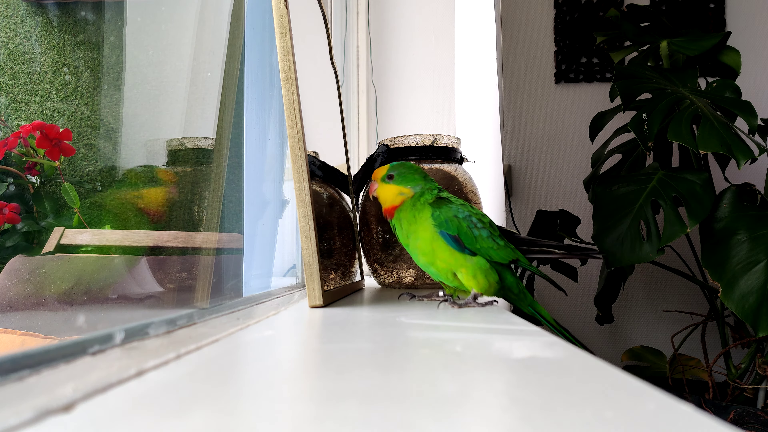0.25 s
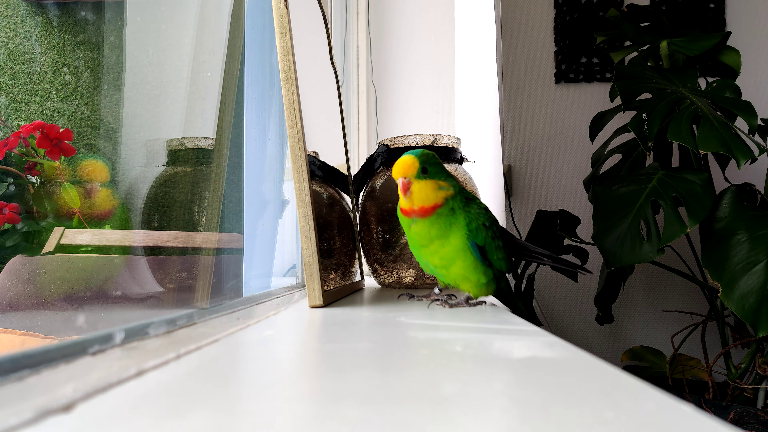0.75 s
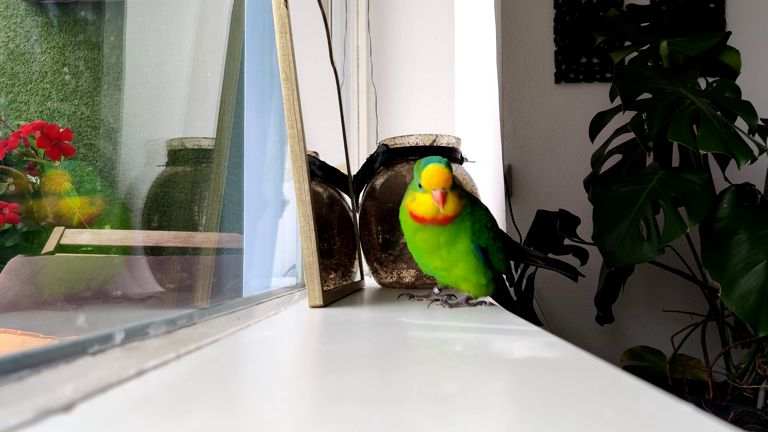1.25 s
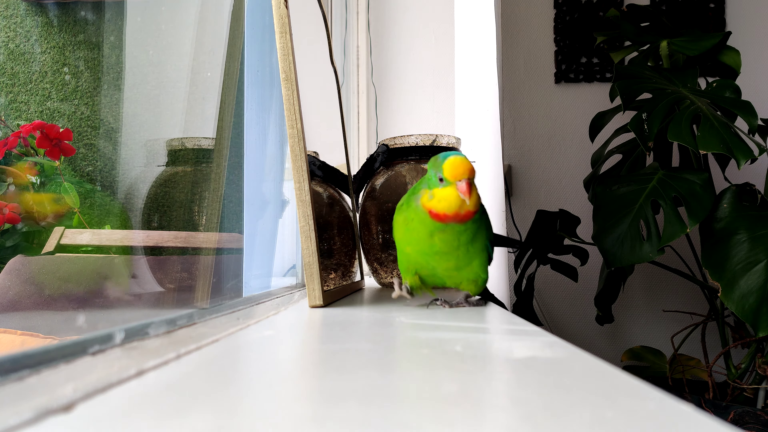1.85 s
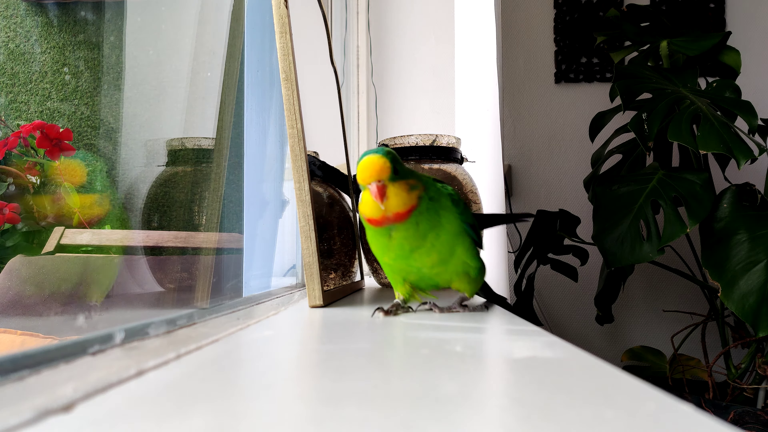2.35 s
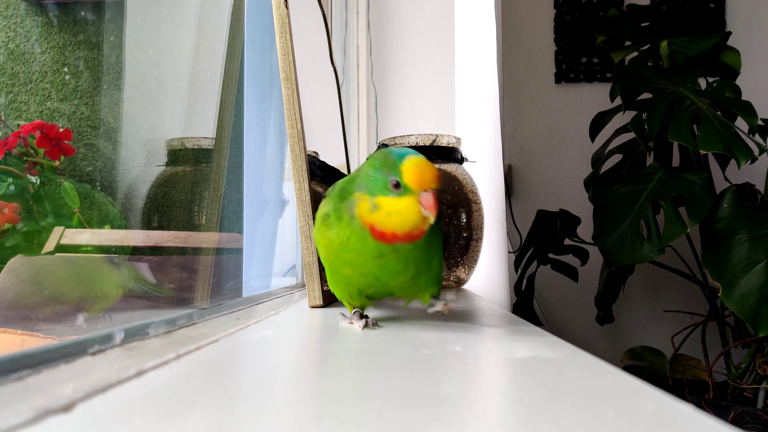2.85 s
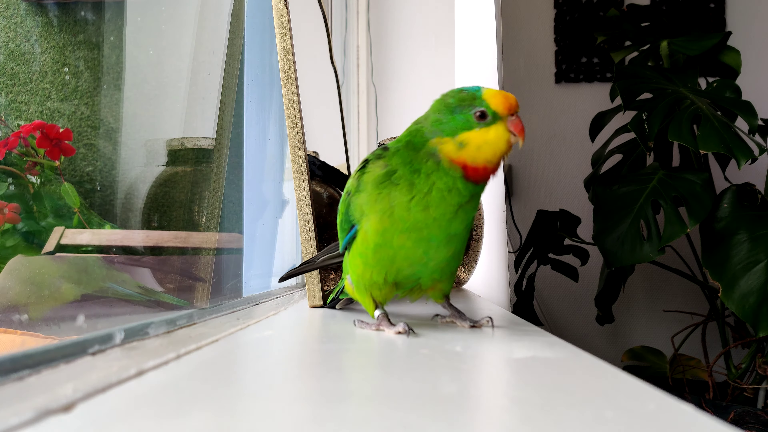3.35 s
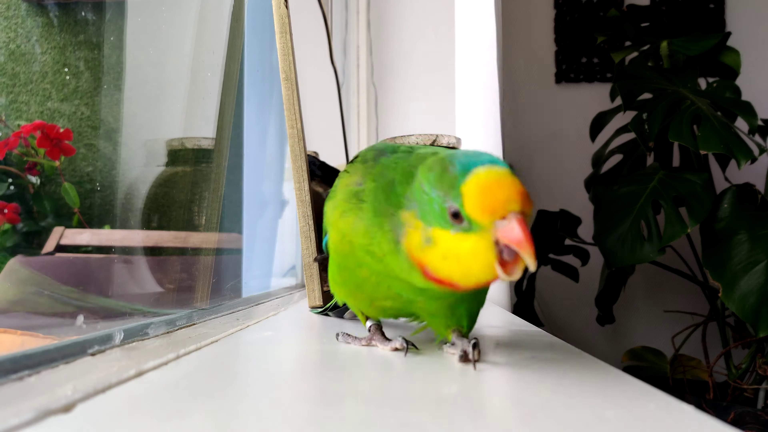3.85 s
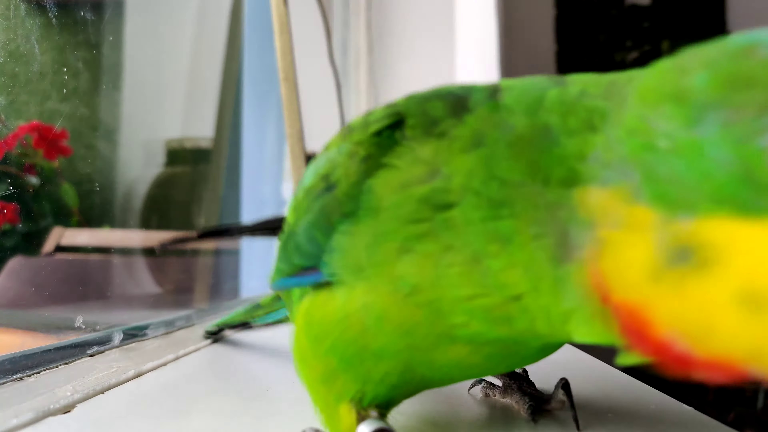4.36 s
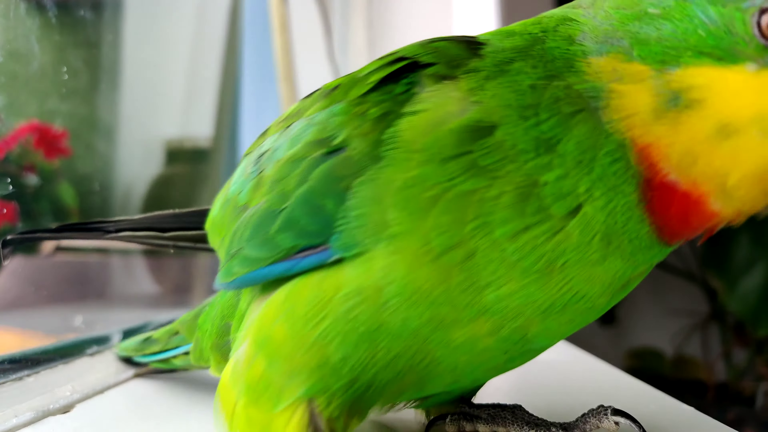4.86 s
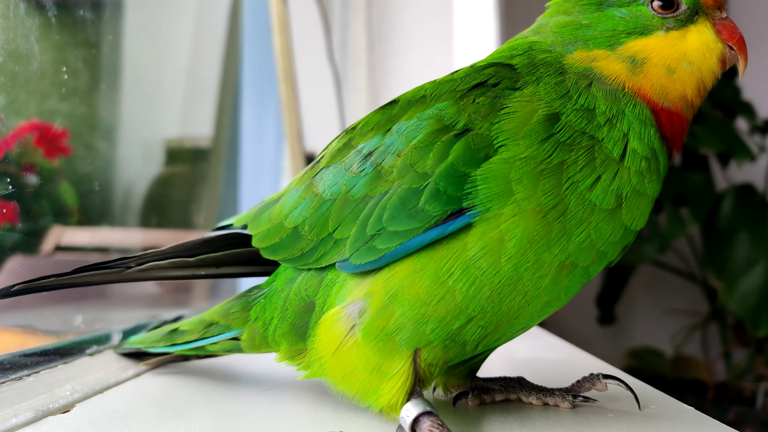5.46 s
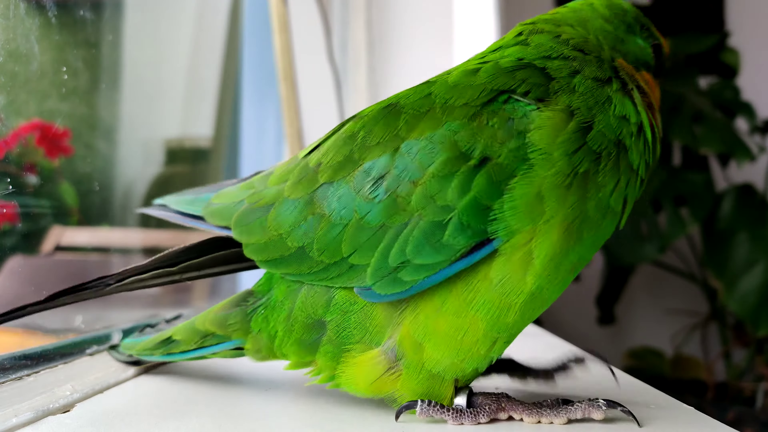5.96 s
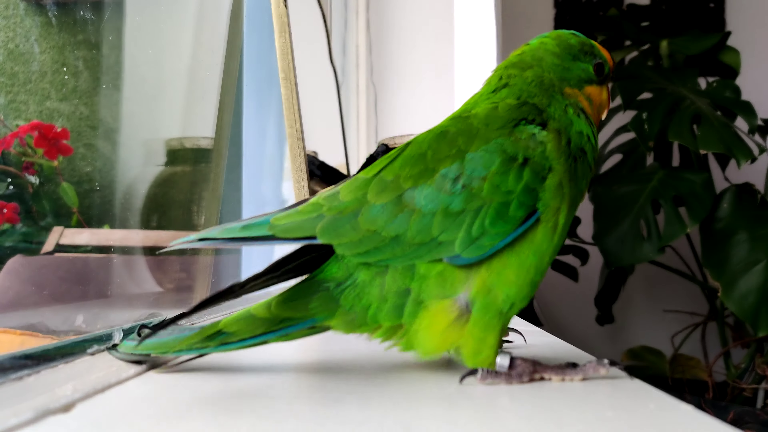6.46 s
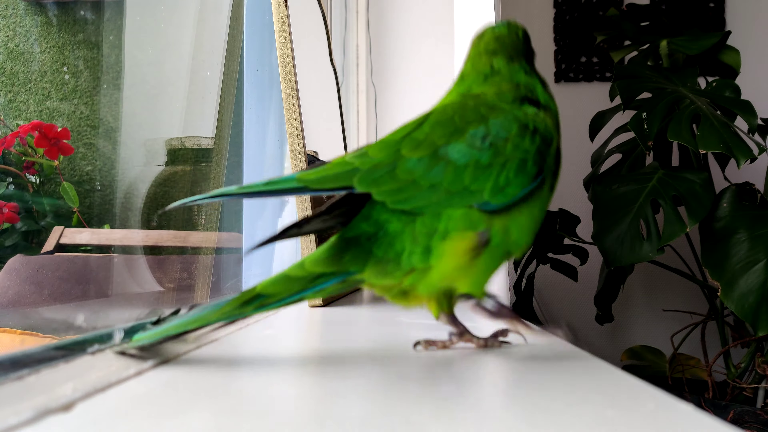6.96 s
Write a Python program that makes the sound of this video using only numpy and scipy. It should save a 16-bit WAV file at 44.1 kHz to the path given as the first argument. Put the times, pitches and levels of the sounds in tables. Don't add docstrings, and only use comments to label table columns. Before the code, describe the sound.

Indoors, one rough wavering parrot squawk rings out, light claw ticks and scuffs approach, a quick close trill and chirp follow, then steps retreat.

```python
import sys
import numpy as np
from scipy import signal
from scipy.fft import rfft, irfft, next_fast_len
from scipy.io import wavfile
from scipy.ndimage import uniform_filter1d, map_coordinates

SR = 44100
rng = np.random.default_rng(int(sys.argv[2]) if len(sys.argv) > 2 else 0)


def transcribe(signal):
    frames = np.atleast_2d(signal).T
    limited = np.clip(frames, -1, 1)
    pcm = np.round(limited * 32767).astype(np.int16)
    wavfile.write(sys.argv[1], SR, pcm)


def attenuation_scalar(level_db):
    decades = np.asarray(level_db, float) / 20
    return 10 ** decades


N = 317961

# t/s, claw tick level/dB, knock level/dB, knock f/Hz
STEPS = [(1.9551, -39, -46, 240), (1.9667, -42, -57.5, 1018), (2.1913, -35.5, -41.5, 301.5),
         (2.3939, -46, -45, 297), (2.4044, -32, -39, 1400), (2.6004, -34.5, -43, 634),
         (2.796, -32, -45, 1060), (2.96, -30, -44.5, 403), (3.1837, -33.5, -39, 875),
         (3.5228, -30, -52, 362), (3.705, -35.5, -33, 445), (3.896, -31, -43.5, 323),
         (4.0568, -40.5, -60.5, 382), (4.1005, -29, -47, 837), (4.1095, -26, -34.5, 556),
         (4.135, -24, -32.5, 922), (4.269, -28, -46, 474), (4.3959, -32.5, -43, 336),
         (4.4618, -47, -59, 300), (4.4675, -33.5, -57.5, 450), (4.5014, -35, -43.5, 230),
         (4.5157, -26, -35, 361), (4.5588, -23.5, -31, 301), (4.5781, -39.5, -36, 300.6),
         (4.8452, -29.5, -36.5, 303), (5.0378, -28.5, -30.5, 291.6), (5.0514, -34.5, -43.5, 1610)]
RETREAT = [
    (5.9614, -42.5, -49.5, 315),
    (5.9697, -39, -55.5, 473),
    (6.1205, -29, -45, 307.5),
    (6.362, -28.5, -44, 651),
    (6.4827, -33.5, -47, 432),
    (7.1, -25.5, -55, 308),
    (7.1429, -30, -41, 320),
]


def unit(x):
    return x / np.sqrt(np.mean(x ** 2) + 1e-20)


def peaked(x):
    return x / np.abs(x).max()


def along(points, hz):
    f, v = np.transpose(points)
    return np.interp(np.log(hz + 1), np.log(f + 1), v)


def curves(rows):
    s, *cols = np.transpose(rows)
    return [np.interp(np.arange(N) / SR, s, c) for c in cols]


def wobble(rate_hz):
    knots = rng.standard_normal(int(N * rate_hz / SR) + 4)
    return map_coordinates(knots, [np.arange(N) * rate_hz / SR])


def filtered(x, response):
    n = x.shape[-1]
    m = next_fast_len(2 * n)
    return irfft(rfft(x, m) * response(np.fft.rfftfreq(m, 1 / SR)), m)[..., :n]


def sided(x, balance, lag_s=0, lead=((1, 0),)):
    half = np.array([[.5], [-.5]])

    def response(hz):
        phase = along(lead, hz) - 2 * np.pi * hz * lag_s
        return attenuation_scalar(half * along(balance, hz)) * np.exp(1j * half * phase)
    return filtered(x, response)


def modes(table):
    def response(f):
        return sum((-1) ** k * attenuation_scalar(db) * 1j * f * w / (c * c - f * f + 1j * f * w)
                   for k, (c, w, db) in enumerate(table))
    return response


def rush(spectrum, patchy_db):
    # f/Hz, left-right likeness
    alike = [(60, 0.96), (130, 0.46), (290, 0.75), (640, 0.47), (1410, 0.069), (3100, 0.93), (6820, -0.21),
             (15000, -0.15)]
    # f/Hz, left minus right level/dB
    air_side = [(60, 2), (110, 3.5), (200, 3), (380, 6.5), (700, 7), (1290, -1), (2380, 4.5), (4400, -1),
                (8120, 0.5), (15000, 3.5)]
    z = signal.stft(rng.standard_normal((2, N)), nperseg=512)[2]
    field = uniform_filter1d(rng.standard_normal(z.shape[1:]), size=6, axis=0)
    field = uniform_filter1d(field, size=14, axis=1)
    pair = signal.istft(z * attenuation_scalar(patchy_db * unit(field)), nperseg=512)[1][:, :N]

    def response(hz):
        turn = np.arccos(np.clip(along(alike, hz), -1, 1)) / 2
        return attenuation_scalar(along(spectrum, hz)) * [np.cos(turn), np.sin(turn)]
    mid, side = filtered(pair, response)
    return unit(sided(np.array([mid + side, mid - side]), air_side))


def air():
    # f/Hz, level/dB
    rumble_db = [(12, -27.5), (20, -1), (54, -5.5), (86, -10.5), (150, -13), (200, -41.5), (330, -120)]
    tone_db = [(60, -40), (110, -16.5), (230, -9.5), (450, -16), (700, -15.5), (1500, -23), (3000, -28),
               (4500, -35.5), (7000, -48.5), (12000, -70.5)]
    hiss_db = [(2500, -30), (4500, -7.5), (7600, -10), (15000, -6), (16200, -5.5), (16600, -32.5)]
    # t/s, level/dB
    bustle = [
        (0, -1),
        (1.7, -2.5),
        (2.35, 2.5),
        (3.3, -2),
        (4.4, 3),
        (5.2, 3.5),
        (5.6, -4),
        (6.3, 2),
        (6.75, -1.5),
        (7.21, 3),
    ]
    # t/s, level/dB
    machine = [
        (.3, -76),
        (.4, -64.5),
        (1.9, -62.5),
        (2.4, -53),
        (2.7, -61),
        (3.9, -63.5),
        (5.4, -68),
        (7.21, -66),
    ]
    # t/s, level/dB
    passing = [
        (6.55, -92),
        (6.62, -47.5),
        (6.78, -56),
        (6.86, -89),
    ]
    bustle_db, = curves(bustle)
    t = np.arange(N) / SR
    hum = attenuation_scalar(curves(machine)[0] + 3.2 * wobble(6.8)) * np.sin(2 * np.pi * (227 * t + .3 * wobble(5.4)))
    drone = attenuation_scalar(curves(passing)[0]) * np.sin(2 * np.pi * 110.0 * t)
    rumble = attenuation_scalar(-55 + .8 * bustle_db + 1.9 * wobble(5.1)) * rush(rumble_db, patchy_db=1.5)
    tone = attenuation_scalar(-58 + .4 * bustle_db) * rush(tone_db, patchy_db=1.9)
    hiss = attenuation_scalar(-70 + bustle_db) * rush(hiss_db, patchy_db=0.9)
    return rumble + tone + hiss + hum + drone


def room(x, colour, balance):
    # f/Hz, t60/s
    t60 = [(200, 0.44), (1000, 0.61), (2500, 0.57), (4000, 0.52), (8000, 0.48), (15000, 0.24)]
    hz, t, z = signal.stft(rng.standard_normal((3, 2, SR * 3 // 4)), SR, nperseg=256)
    start_db = along(colour, hz) + np.array([[.5], [-.5]]) * along(balance, hz)
    decay_db = start_db[..., None] - 60 * t / along(t60, hz)[:, None]
    tail = signal.istft(z * attenuation_scalar(decay_db), SR, nperseg=256)[1]
    tail = tail * (1 - np.exp(-np.arange(tail.shape[-1]) / (0.0017 * SR)))
    tail = tail / np.linalg.norm(tail[0]) * np.sqrt(2)
    turn = np.cos(np.pi * (np.arange(N) / (.09 * SR) + np.arange(3)[:, None] / 3)) ** 2
    return signal.fftconvolve((x * turn)[:, None], tail, axes=2).sum(0)[:, :N]


def echoes(x):
    surfaces = [(.0011, 0.0017, -14.5), (.0027, 0.0025, -16.5), (.0046, 0.0049, -15.5),
                (.0083, 0.0095, -16.5)]
    return sum(attenuation_scalar(db) * np.array([np.roll(x, round(left * SR)), np.roll(x, round(right * SR))])
               for left, right, db in surfaces)


def scuffs():
    # t/s, length/s, level/dB
    drags = [(0.381, .025, -61), (2.218, .09, -66), (4.051, .035, -56), (4.385, .026, -52),
             (4.465, .058, -53), (4.514, .03, -47), (4.802, .066, -56), (4.949, .098, -52),
             (5.089, .03, -56), (5.841, .03, -69.5), (6.001, .04, -69), (6.23, .03, -64.5),
             (7.015, .025, -55)]
    # t/s, level/dB
    scrapes = [(1.852, -57.5), (2.138, -62), (2.48, -61.5), (2.712, -61.5), (2.798, -56), (2.884, -59),
               (3.47, -62.5), (3.692, -58), (3.77, -46.5), (4.0, -57), (4.325, -67), (5.897, -62),
               (6.282, -58.5), (6.99, -64)]
    # f/Hz, level/dB
    rustle = [(1500, -38.5), (2500, -13), (3800, -8.5), (5200, -2), (6500, -5), (10300, -5.5), (15000, -9),
              (16500, -25)]
    slide_s, slide_db, scrape_s = .04, -35.5, .015
    slides = [(s, slide_s, tick_db + slide_db) for s, tick_db, *_ in STEPS + RETREAT]
    stroke = np.zeros(N + SR)
    for s, length_s, db in drags + slides + [(s, scrape_s, db) for s, db in scrapes]:
        n = round(length_s * SR)
        stroke[round(s * SR):][:n] += attenuation_scalar(db) * np.hanning(n) ** 0.2
    shared, own = rng.standard_normal(N), rng.standard_normal((2, N))
    grit = filtered(shared + 0.77 * own, lambda hz: attenuation_scalar(along(rustle, hz)))
    grit = unit(grit * attenuation_scalar(1.7 * wobble(500)))
    return stroke[:N] * grit * attenuation_scalar([[1.5], [-1.5]])


def ring_drag(s, length_s, level_db, partials):
    t = np.arange(N) / SR - s
    drag = (t > 0) * (t < length_s) * attenuation_scalar(level_db - 12 * np.clip(t, 0, length_s) / length_s)
    return drag * sum(attenuation_scalar(db + 4.8 * wobble(210)) * np.sin(2 * np.pi * (hz * t + 0.193 * wobble(150)))
                      for hz, db in partials)


def leg_ring():
    # f/Hz, level/dB
    partials = [(1916, -59), (3050, -60.5), (3628, -65), (4840, -57.5), (6158, -59), (7526, -63),
                (9243, -67), (10990, -75)]
    long_drag = ring_drag(2.594, .125, level_db=-4, partials=partials)
    return long_drag + ring_drag(1.852, .02, level_db=6, partials=partials[3:4])


def feet():
    # t/s, claw tick level/dB, knock level/dB, knock f/Hz
    shuffle = [
        (.012, -75.5, -56, 300),
        (.338, -68, -56.5, 300),
        (.385, -68.5, -41.5, 230),
    ]
    # f/Hz, level/dB
    claw = [(880, -29), (1500, -9.5), (2500, -5), (4850, -1), (7180, -10.5), (9990, -5), (11700, -12),
            (14800, -0.5), (16500, -24.5)]
    # f/Hz, width/Hz, level/dB
    board = [(450, 360, -8.5), (910, 160, -13), (1400, 1500, -5), (2240, 400, -3.5)]
    cavity = [(134, 28, 1.5), (259.6, 48, -0.5)]
    over_knock_db, drop_db_per_octave = 3, 3.5
    pan_mean_db, pan_spread_db = 5, 2.5
    ticks, lows = np.zeros((2, N + SR)), np.zeros(N + SR)
    t = np.arange(SR // 8) / SR
    push = -np.exp(-((t - .0006) / 0.00013) ** 2)
    for s, tick_db, knock_db, knock_hz in shuffle + STEPS + RETREAT:
        thud_db = knock_db + over_knock_db - drop_db_per_octave * np.log2(knock_hz / cavity[1][0])
        pan_db = pan_mean_db + pan_spread_db * rng.standard_normal()
        grit = rng.standard_normal((4, len(t)))
        burst = (grit[0] + .5 * grit[:2]) * (attenuation_scalar(-60 * t / 0.011) + .08 * attenuation_scalar(-60 * t / .06))
        tick = filtered(burst, lambda hz: attenuation_scalar(along(claw, hz)))
        skin = modes([(knock_hz, 0.44 * knock_hz, 0)] + board)
        knock = filtered(push + 0.4 * grit[2] * attenuation_scalar(-60 * t / .07), skin) + 0.39 * push
        thud = filtered(push + 0.16 * grit[3] * attenuation_scalar(-60 * t / .06), modes(cavity))
        low = attenuation_scalar(knock_db + 11.0) * peaked(knock) + attenuation_scalar(thud_db) * peaked(thud)
        at = round(s * SR)
        lows[at:][:len(t)] += low
        ticks[:, at:][:, :len(t)] += attenuation_scalar([[pan_db / 2], [-pan_db / 2]]) * attenuation_scalar(tick_db) * peaked(tick)
    return ticks[:, :N] + sided(lows[:N], [(100, 8.8), (1500, 5.5)], lag_s=-.00022)


def smacks():
    # t/s, level/dB
    clicks = [
        (4.937, -33.5),
        (5.008, -21),
        (5.0112, -26),
        (5.028, -23.5),
        (5.125, -35.5),
    ]
    # f/Hz, width/Hz, level/dB
    beak_modes = [(1000, 700, -6), (3800, 900, 0), (9000, 7000, -13)]
    t, puffs = np.arange(SR // 50) / SR, np.zeros(N + SR)
    for s, db in clicks:
        puffs[round(s * SR):][:len(t)] += attenuation_scalar(db + 6.5 - 60 * t / 0.004) * rng.standard_normal(len(t))
    return filtered(puffs[:N], modes(beak_modes))


def warble(cycles, end, opening, swell_db, entry, shoulder, high, sag_db, high_db, fade_db_per_s):
    notes, above, lead_db = [], None, -swell_db
    ends = [c[0] for c in cycles[1:]] + [end]
    for (s, dip_s, trough, crest, db), after in zip(cycles, ends):
        first = trough + entry * (above - trough) if above else opening * trough
        leap, top, above = (trough + share * (crest - trough) for share in high)
        crest_db = min(high_db, db + 2.5)
        faded_db = crest_db - fade_db_per_s * (after - s - dip_s)
        notes += [(s, first, trough, min(shoulder * trough, crest), db + lead_db / 2, db - lead_db / 2),
                  (s + dip_s, leap, top, above, crest_db, faded_db)]
        lead_db = sag_db
    return notes + [(end, above, above, above, -70, -70)]


def flat(s, length_s, hz, db):
    overshoot, droop = 1.11, .988
    settle = .14
    soft_db, release_db = 6.5, 9
    low = droop * hz
    return [(s, overshoot * hz, (overshoot + 1) / 2 * hz, hz, db - soft_db, db),
            (s + settle * length_s, hz / droop, hz, low, db, db),
            (s + (1 - settle) * length_s, low, low, hz, db - release_db / 2, db - 2 * release_db),
            (s + length_s, low, low, low, -85, -85)]


def call(notes, throat, edge_s, jitter, shimmer_db, bright, breath_db, half_db):
    # t/s, f/Hz, lift/dB
    beak = [(.05, 4800, 3), (.085, 5700, 16.5), (.11, 4450, 9), (.15, 3740, 7.5), (.195, 3750, 9.5),
            (.22, 3250, 12.5), (.26, 3200, 6.5), (4.99, 5500, -2.5), (5.008, 3900, 12.5),
            (5.03, 3800, 14.5), (5.04, 3750, 1)]
    start, span = round(notes[0][0] * SR) - 400, SR // 3
    pitch, effort_db = np.full(span, float(notes[0][1])), np.full(span, -90.)
    for (s, first, middle, last, from_db, to_db), after in zip(notes, notes[1:]):
        at = slice(round(s * SR) - start, round(after[0] * SR) - start)
        u = np.linspace(0, 1, at.stop - at.start)
        pitch[at] = first * (1 - u) * (1 - 2 * u) + 4 * middle * u * (1 - u) + last * u * (2 * u - 1)
        pitch[at.stop:] = last
        effort_db[at] = from_db + (to_db - from_db) * u
    pitch = uniform_filter1d(pitch, size=60) * (1 + jitter * wobble(400)[:span])
    edge = int(edge_s * SR)
    force = signal.fftconvolve(attenuation_scalar(effort_db), np.hanning(edge) * 2 / edge, "same")
    phase = 2 * np.pi * np.cumsum(pitch) / SR
    k = np.arange(1, 15)[:, None]
    mouth_hz, lift_db = (c[start:start + span] for c in curves(beak))
    colour_db = along(throat, k * pitch) + lift_db / (1 + ((k * pitch - mouth_hz) / 500) ** 2)
    slack_db = 20 * np.log10(np.abs(force) / force.max() + 1e-4)
    knots = np.broadcast_arrays(k - 1, np.arange(span) * 200 / SR)
    flutter = map_coordinates(rng.standard_normal((len(k), 200)), knots, order=1)
    overtone_db = np.log2(k) * (bright * slack_db + shimmer_db * np.tanh(flutter))
    strength = attenuation_scalar(colour_db + overtone_db) * (k * pitch < SR / 2.5)
    voice = np.sum(strength * -np.cos(k * phase + .55 * (k - 1) * (k - 2)), 0)
    leak = filtered(rng.standard_normal(span), lambda hz: attenuation_scalar(along(throat, hz))) * (1 + np.cos(phase))
    voice = voice * (1 + attenuation_scalar(half_db) * np.cos(phase / 2)) + attenuation_scalar(breath_db) * unit(leak)
    out = np.zeros(N)
    out[start:start + span] = 1.36 * force * voice
    return out


def peep():
    # t/s, length/s, f/Hz, effort/dB
    tones = [
        (1.14, .012, 1750, -61),
        (1.152, .018, 1080, -60),
    ]
    # f/Hz, level/dB
    peep_throat = [(1000, 0), (1800, 0), (2200, -30), (16000, -60)]
    return call(flat(*tones[0])[:-1] + flat(*tones[1]), peep_throat, edge_s=.006, jitter=.015,
                shimmer_db=1.2, bright=.1, breath_db=-12, half_db=-45)


def squawk():
    # t/s, dip length/s, trough f/Hz, crest f/Hz, dip effort/dB
    cycles = [
        (.0535, .028, 1255, 1470, -20),
        (.096, .026, 1090, 1571, -16),
        (.140, .022, 1094, 1641, -16),
        (.187, .021, 1236, 1621, -17),
        (.227, .025, 1108, 1067, -18),
    ]
    # shares of the climb; end/s, levels/dB, fade/(dB/s)
    shape = dict(end=.254, opening=.97, swell_db=7, entry=.65, shoulder=1.2, high=(.99, .93, .75),
             sag_db=2.5, high_db=-15.5, fade_db_per_s=600)
    # f/Hz, level/dB
    squawk_throat = [(500, -31.5), (1050, -6.5), (1550, -14), (1950, -10.5), (2250, -8.5), (3500, -6),
                     (5500, -16), (6800, -24.5), (9000, -18.5), (11000, -29.5), (13000, -40), (16000, -51)]
    return attenuation_scalar(7) * call(warble(cycles, **shape), squawk_throat, edge_s=0.0058, jitter=0.0055,
                         shimmer_db=2.2, bright=0.64, breath_db=-35.5, half_db=-24)


def trill():
    # t/s, dip length/s, trough f/Hz, crest f/Hz, dip effort/dB
    rolls = [
        (4.937, .010, 2414, 3082, -25.5),
        (4.958, .018, 2310, 2995, -24),
        (4.983, .014, 2215, 3137, -17.5),
    ]
    fall = [
        (5.0075, .0125, 1430, 1890, -15.5),
        (5.041, .008, 1104, 1080, -32),
    ]
    roll_shape = dict(end=5.0075, opening=1.08, swell_db=-1.5, entry=.18, shoulder=1.05, high=(.15, .65, .99),
                  sag_db=0.5, high_db=-20, fade_db_per_s=-150)
    fall_shape = dict(end=5.056, opening=1.32, swell_db=-10, entry=.1, shoulder=1.07, high=(0.28, .9, 0.22),
                  sag_db=1, high_db=-36.5, fade_db_per_s=899.5)
    # f/Hz, level/dB
    trill_throat = [(900, -11.5), (1500, -2), (2300, 3), (2900, -4.5), (3500, -6), (4600, -9),
                    (6000, -12.5), (7200, -33), (8500, -45.5), (16000, -68.5)]
    notes = warble(rolls, **roll_shape)[:-1] + warble(fall, **fall_shape)
    sung = call(notes, trill_throat, edge_s=.0016, jitter=.01, shimmer_db=1.8, bright=.2,
                breath_db=-24, half_db=-32)
    return attenuation_scalar(3) * sung + smacks()


def chirp():
    # t/s, length/s, f/Hz, effort/dB
    held_note = (5.125, .030, 1780.5, -13.5)
    # f/Hz, level/dB
    chirp_throat = [(1000, -5), (1780, -1.5), (3560, 0.2), (5340, 0.5), (7100, -17.5), (8900, -17),
                    (10700, -25), (12500, -37), (16000, -47)]
    return attenuation_scalar(5) * call(flat(*held_note), chirp_throat, edge_s=.0025, jitter=.0035, shimmer_db=1.4,
                         bright=.4, breath_db=-33, half_db=-42)


def scene():
    # f/Hz, level/dB
    far_side = [(700, -1), (1150, 3), (1800, 7), (2500, 6), (3500, 4), (5000, -3), (8500, -15), (13000, -8)]
    trill_side = [(700, -1), (1800, 3), (2400, 4), (3300, -2), (5000, -6), (7000, -10), (9500, -5),
                  (13000, -7)]
    chirp_side = [(1000, 1), (1780, 7), (3560, -2), (5340, -1), (7100, -8), (9000, -5), (12500, -1)]
    # f/Hz, left lead/rad
    shadow = [(2600, 0), (3300, 2.9), (4000, 2.9), (4800, 0)]
    # f/Hz, level/dB
    beaming = [(1780, 3), (3560, -1), (5340, -6), (9000, -4)]
    # f/Hz, level/dB
    call_colour = [(200, -3), (1100, -7), (2400, -1.5), (3500, -0.5), (6200, 1.5), (9000, -3), (13000, 3),
                   (16000, -4)]
    step_colour = [(200, 0), (1200, -6), (3500, -1.5), (8000, -7.5), (16000, 4)]
    # f/Hz, level/dB
    call_room_side = [(1000, -1), (1800, -3), (3500, -3), (7000, -5), (9500, -8), (13000, 0.5)]
    step_room_side = [(200, 3), (8000, 1.5)]
    steps = feet() + scuffs() + leg_ring()
    peeped, squawked, trilled, chirped = peep(), squawk(), trill(), chirp()
    voice = sided(squawked, far_side) + sided(trilled, trill_side, lag_s=0.0001205)
    voice = voice + sided(chirped, chirp_side, lag_s=0.0001, lead=shadow) + peeped
    near = echoes(squawked + attenuation_scalar(-7) * trilled + attenuation_scalar(-14) * chirped)
    beamed = filtered(chirped, lambda hz: attenuation_scalar(along(beaming, hz)))
    sent = attenuation_scalar(-5) * squawked + attenuation_scalar(-20.5) * trilled + attenuation_scalar(-16.5) * beamed
    wet = room(sent, call_colour, call_room_side)
    wet = wet + attenuation_scalar(-7.5) * room(steps.mean(0) + peeped, step_colour, step_room_side)
    return voice + near + steps + wet + air()


def low_pass(x):
    return signal.sosfilt(signal.butter(12, 16810, fs=SR, output="sos"), x)


def record(dry):
    level_db = 10 * np.log10(np.abs(uniform_filter1d(np.mean(dry ** 2, 0), size=700)) + 1e-12)
    creep_db = 30 * np.arange(N) / SR
    duck_db = np.maximum.accumulate(0.21 * np.maximum(level_db + 23.5, 0) + creep_db) - creep_db
    held = dry * attenuation_scalar(-uniform_filter1d(duck_db, size=300))
    rounded = held / (1 + np.abs(held / .93) ** 6) ** (1 / 6)
    return low_pass(rounded)


dry = scene()
out = record(dry)
transcribe(out)
```